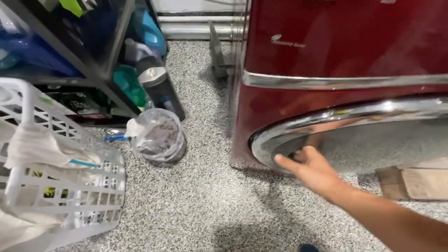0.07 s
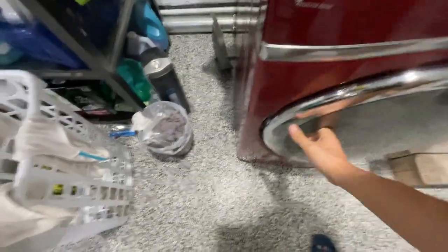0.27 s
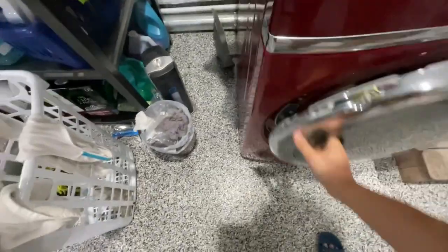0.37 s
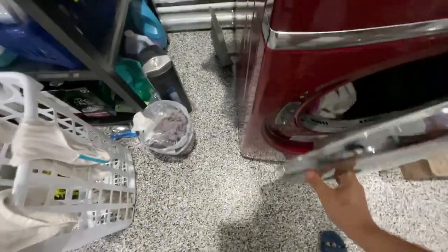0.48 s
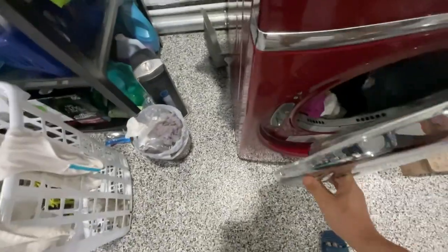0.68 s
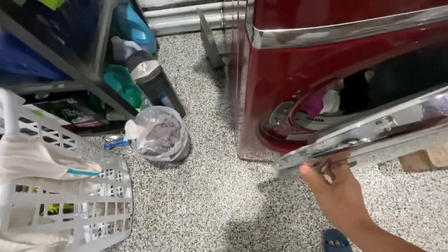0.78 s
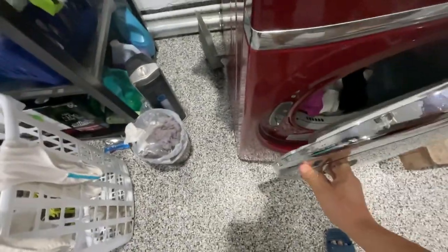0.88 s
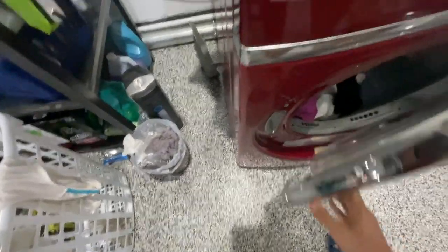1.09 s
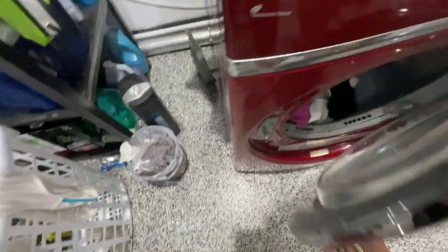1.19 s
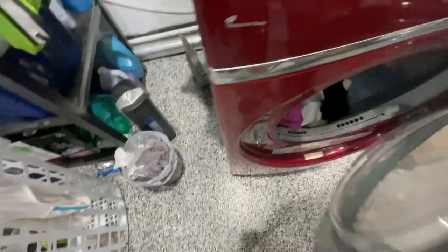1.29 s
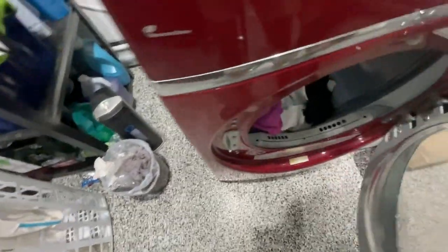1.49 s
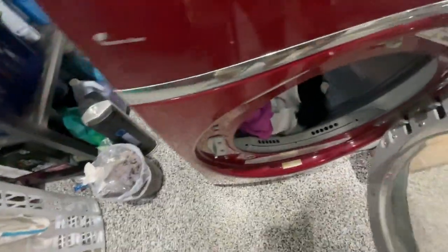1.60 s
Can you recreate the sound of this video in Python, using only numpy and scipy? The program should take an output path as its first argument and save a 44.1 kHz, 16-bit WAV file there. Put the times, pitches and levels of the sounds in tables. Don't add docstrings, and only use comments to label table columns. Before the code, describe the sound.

Front-loading washer door unlatches with a loud clunk, small clicks, then a faint sandal scuff.

```python
import sys
import numpy as np
from scipy import signal
from scipy.fft import rfft, irfft, next_fast_len
from scipy.io import wavfile
from scipy.ndimage import uniform_filter1d

SR = 44100
rng = np.random.default_rng(int(sys.argv[2]) if len(sys.argv) > 2 else 0)


def log_audio(samples):
    frames = np.atleast_2d(samples).T
    limited = np.clip(frames, -1, 1)
    pcm = np.round(limited * 32767).astype(np.int16)
    wavfile.write(sys.argv[1], SR, pcm)


def invert_db(level):
    return 10 ** (np.asarray(level, dtype=float) / 20)


N = 72765
T = np.arange(N) / SR

# pitch_hz, level_db
AIR_COLOUR = [(35, -44.5), (60, -17), (146, -7.5), (315, -14), (417, -19.5), (480, -16.5), (842, -28.5),
              (1910, -28.5), (16000, -57.5)]
# time_s, level_db
RUMBLE_LEVEL = [(0, -42), (.12, -56.5), (.26, -51), (.33, -37.5), (.5, -44.5), (.78, -57.5), (1.02, -59),
                (1.1, -60.5), (1.5, -56), (1.65, -55)]
# time_s, level_db
RUSTLE_LEVEL = [
    (0.0, -63.5),
    (0.138, -68.5),
    (0.218, -57),
    (0.25, -71),
]
# pitch_hz, level_db
RUSTLE_COLOUR = [(130, 0), (200, -6.5), (450, -17.5), (700, -10), (1000, -21), (3000, -29), (10000, -44),
                 (16000, -63.5)]
# pitch_hz, fade_60db_s, level_db
GARAGE_ECHOES = [(125, 1, -19.5), (256, 0.82, -13), (463, 0.59, -9), (945, 0.54, -12.5), (2250, 0.19, -9),
                 (3970, 0.63, -17.5), (8200, 0.3, -11.5), (12900, 0.59, -18)]
# time_s, level_db
SCUFF_LEVEL = [
    (1.1, -95.5),
    (1.2, -69.5),
    (1.262, -68),
    (1.278, -56.5),
    (1.325, -58),
    (1.4, -62.5),
    (1.465, -61),
    (1.53, -68),
    (1.65, -65),
]
# pitch_hz, level_db
SCUFF_COLOUR = [(200, 4), (500, 1.5), (1500, 0), (3500, -4), (6000, -6), (10500, -14.5), (16000, -21.5)]
# start_s, level_db, pitch_hz, fade_60db_s, hiss_db
TICKS = [(.822, -66, 4600, 0.0054, -11), (.833, -50.5, 2563, 0.026, -9), (1.062, -61.5, 4500, 0.0093, 4),
         (1.1694, -61.5, 4380, 0.019, 4.5), (1.1996, -55.5, 4470, 0.012, 5.5),
         (1.2765, -50.5, 1060, 0.012, 12.5), (1.296, -46, 6100, .01, -4), (1.32, -54, 5900, .012, 10),
         (1.4445, -44, 2010, 0.013, 0), (1.461, -56, 3370, 0.008, 4), (1.4651, -48, 2500, 0.016, 3),
         (1.472, -61, 1810, .015, -1), (1.548, -56, 2750, .02, -8), (1.545, -72, 14000, 0.0066, -27),
         (1.5766, -55.5, 13600, 0.0034, 6.5), (1.63, -72, 14820, 0.0046, -10)]
# start_s, level_db, length_s, swing_hz
BLOWS = [(.17, -48, 0.023, 169), (0.275, -30.5, 0.016, 200), (.289, -20.5, 0.013, 253.5),
         (.2985, -15.5, 0.023, 160.2), (0.325, -21, 0.025, 148), (0.3609, -13.5, 0.025, 145.4),
         (0.388, -32.5, 0.021, 193), (.41, -42, .03, 140.5), (0.471, -38.5, 0.06, 108),
         (.53, -46.5, 0.062, 113.8), (.60, -42, 0.052, 155), (.66, -45, 0.028, 125),
         (0.733, -43.5, 0.025, 129), (.935, -51, 0.016, 218), (.972, -48, 0.023, 147.7),
         (1.571, -44.5, 0.018, 192), (1.588, -36, 0.037, 106.9)]
# pitch_hz, level_db, fade_60db_s
CABINET_TONES = [(56, -14, .6), (72.76, -12, .5), (108, -19.5, 0.26), (126.8, -7, 0.21), (155, 0, 0.08),
                 (217.5, 0, 0.057), (249.6, -2.5, 0.11), (308.9, -9, 0.29)]
HINGE_TONES = [(331, -12, 0.085), (552.5, -2.5, 0.063), (791, -1, 0.035), (1090, -6, 0.034),
               (1288, -2, 0.034), (1747, -3.5, 0.041), (2225, -1.5, 0.023), (2460, -3, 0.026),
               (2896, -9.5, .02), (3640, -16, 0.0216)]
HANDLE_TONES = [(599, -3.5, 0.024), (750, -3.5, 0.037), (995, -7.5, 0.024), (1254, -1, 0.025),
                (1480, 1.5, 0.01), (1824, 0.5, 0.022), (3070, -5.5, 0.019), (4440, -2.5, 0.0038),
                (5900, -13.5, 0.0037), (7600, -13.5, 0.0035)]
DOOR_TONES = [(515, -14, 0.04), (560.3, -13.5, 0.054), (760, -14.5, 0.03), (842, -17, 0.031),
              (998, -9.5, 0.03), (1097, -5, 0.019), (1340, -2.5, 0.022), (1467, -5.5, 0.022),
              (1680, -15.5, 0.0088), (2310, -10, 0.012), (2750, -10.5, 0.015), (3700, -13, 0.0039),
              (4600, -8, 0.002), (6440, -14.5, 0.0053)]
LATCH_TONES = [(640, -18, .03), (803, -19, 0.016), (1312, -7, 0.022), (1503, -8, 0.013),
               (1840, -10, 0.0087), (2740, -19, 0.0087), (3800, -1, 0.011), (4420, -1.5, 0.005),
               (4685, -1, 0.0051), (5614, -5.5, 0.007), (6114, 1, 0.0074), (8630, -14.5, .008),
               (10270, -12, 0.012)]
# start_s, length_s, level_db, tilt_db_per_octave, grit_db
KNOCK = [
    (.6795, 0.0058, -42, 2, -17),
    (.685, 0.0078, -37, 0.9, -31),
    (.698, 0.0068, -38.5, -1, -28),
    (.71, 0.017, -47, 0.5, -35),
]
# start_s, length_s, level_db, tilt_db_per_octave, grit_db
CLICKS = [
    (.136, 0.0042, -41, 2, -18),
    (.1825, 0.0029, -35.5, -2.7, -25.5),
    (.1975, 0.0099, -29.5, -0.5, -6),
]
# start_s, length_s, level_db, tilt_db_per_octave, grit_db
CLATTER = [(.2805, 0.0053, -26, 0.5, -12.5), (.2862, 0.0041, -13, 0.5, -12.5),
           (.2922, .004, -16, -0.5, -11.5), (.2968, .005, -20.5, -3.5, -5.5),
           (.3045, 0.0064, -22.5, -5, -7.5), (.338, .008, -31.5, -1, 0), (.3462, .007, -14.5, 1.13, -10.5),
           (.3525, 0.0062, -18.5, 4, -10), (.3575, 0.0079, -22, 2.5, -11.5),
           (.366, 0.0078, -27.5, -12.5, -12), (.384, 0.019, -30, -8, -6.5), (.405, .012, -37, -5, -11),
           (.459, 0.012, -45, 12.5, 1.5)]
# pitch_hz, left_minus_right_db
PORT_LEVELS = [(60, -.5), (300, -1.5), (700, 4.5), (1400, 2.5), (2380, 1.5), (4200, -1.5), (7000, -2),
               (9500, 0)]
# pitch_hz, phase_lead_rad
PORT_PHASE = [(0, 0), (400, -.6), (1460, -1.1), (2150, -2.6), (4220, -6.4), (6200, -8), (8600, -12.6),
              (22050, -13)]
# pitch_hz, level_db
MIDDLE_LIFT = [(1300, 0), (1800, 2), (2400, 6), (3100, 2.5), (4200, 0), (6200, 0), (7000, 3.5), (8000, 0)]

SIDES = np.array([[1], [-1]])
SNAP_S, SNAP_DB = .2476, -7.5
REBOUND_S, REBOUND_DB = 0.0048, -11.5


def read(table, x, log=False):
    a, b = np.array(table, float).T[:2]
    if log:
        return np.interp(np.log(np.maximum(x, 1)), np.log(np.maximum(a, 1)), b)
    return np.interp(x, a, b)


def unit(x):
    return x / np.sqrt(np.mean(x ** 2) + 1e-30)


def band(x, lo_hz, hi_hz):
    edges = [lo_hz, min(hi_hz, .47 * SR)]
    return signal.sosfilt(signal.butter(2, edges, "band", fs=SR, output="sos"), x)


def colour(x, table):
    gain = invert_db(read(table, np.fft.rfftfreq(N, 1 / SR), log=True))
    return unit(irfft(rfft(x) * gain, N))


def walk(rate, size=1):
    k = int(SR / rate)
    steps = np.repeat(rng.standard_normal((size, N // k + 1)), k, axis=1)
    return 1.4 * uniform_filter1d(uniform_filter1d(steps, k), k)[:, :N]


def add(out, x, at_s, db):
    i = int(at_s * SR)
    x = x[:N - i]
    out[i:i + len(x)] += x * invert_db(db) / np.abs(x).max()


def ring(tones, tilt_db=0., count=5):
    hz, db, t60 = np.repeat(np.array(tones, float), count, axis=0).T[:, :, None]
    t = T[:SR // 4]
    chance = rng.standard_normal((3, len(hz), 1))
    spread = 0.02 * (count > 1) * np.clip(0.039 / t60, .2, 2)
    hz = np.minimum(hz * (1 + spread * chance[0]), .45 * SR)
    sign = np.repeat(np.sign(chance[1, ::count]), count, axis=0)
    gain = sign * invert_db(db + 1.9 * chance[2] + tilt_db * np.log2(hz / 1300))
    fade = np.exp(-np.log(1000) * t / t60)
    return (gain * np.sin(2 * np.pi * hz * t) * fade).sum(axis=0)


def contacts(table, tones, body_share, body_hz):
    out = np.zeros(N)
    for at, length, db, tilt, grit_db in table:
        n = int(length * SR)
        noise = rng.standard_normal((2, 2000))
        body = band(rng.standard_normal(SR // 4), *body_hz) * np.exp(-T[:SR // 4] / 0.0038)
        hits = noise[0, :n] * (np.abs(noise[1, :n]) > 1.9) + 2.7 * (np.arange(n) == 0)
        response = ring(tones, tilt, count=2) + body_share * body
        add(out, signal.fftconvolve(hits, response), at, db)

        fade = np.exp(-np.maximum(T[:2000] - 0.71 * length, 0) / 0.0024)
        grit = band(noise[1] * invert_db(np.abs(noise[0])) * fade, 3500., 14000.0)
        grit = grit + .5 * band(noise[0] * fade, 9000., 12000.0)
        add(out, grit, at, db + grit_db)
    return out


def background():
    air = [colour(rng.standard_normal(N), AIR_COLOUR) * invert_db(-67 + 3.1 * walk(32)[0]) for _ in range(2)]

    low = unit(band(band(rng.standard_normal(N), 31.0, 75.), 45.0, 74.0))
    low = low * invert_db(read(RUMBLE_LEVEL, T) + 2.0 * walk(4.5)[0])

    cloth = colour(rng.standard_normal(N), RUSTLE_COLOUR)
    cloth = cloth * invert_db(read(RUSTLE_LEVEL, T) + 9.5 + 1.7 * walk(45)[0])
    cloth = cloth * np.clip((.3 - T) / 0.046, 0, 1)
    return air[0] + low + cloth + 0.61 * air[1] * SIDES


def garage(x):
    t, tail = T[:SR], 0
    alike = .2
    for hz, t60, db in GARAGE_ECHOES:
        mid, side = rng.standard_normal((2, SR))
        wide = np.sqrt(1 - alike) * min(hz / 700, 1)
        pair = band(np.sqrt(1 + alike) * mid + wide * side * SIDES, hz / 1.7, hz * 1.7)
        fade = np.exp(-np.log(1000) * t / t60)
        tail = tail + pair * fade * invert_db(db) / np.sqrt(t60 * SR / 14)
    tail = tail * np.clip((t - .003) / 0.005, 0, 1)
    return signal.fftconvolve(x[None], tail, axes=1)[:, :N]


def sandal():
    grains_per_s = 2500
    grains = (rng.random(N) < grains_per_s / SR) * rng.standard_normal(N)
    grains = grains * invert_db(2.96 * rng.exponential(size=N))
    drag = colour(unit(grains) + 1.51 * rng.standard_normal(N), SCUFF_COLOUR)
    level_db = read(SCUFF_LEVEL, T)
    drag = drag + band(drag, 5760.0, 21000.0) * invert_db(3.2 * (level_db + 59.5))
    onset = np.clip((T - SCUFF_LEVEL[0][0]) / 0.0377, 0, 1)
    return drag * invert_db(level_db + 2.0 + 0.5 * walk(49.4)[0]) * onset


def ticks():
    out = np.zeros(N)
    for at, db, hz, t60, hiss_db in TICKS:
        spit = rng.standard_normal((2, 1500)) * np.exp(-T[:1500] / 0.00276)
        tones = [(hz, 0, t60), (1.4 * hz, -14, t60), (.55 * hz, -13, t60)]
        add(out, signal.fftconvolve(spit[0, :8], ring(tones, count=2)), at, db)
        add(out, band(spit[1], 900., 11000.), at, db + hiss_db)
    return out


def cabinet():
    sag, thud_db, hum_db = 0.079, -12.5, -19.5
    swing, thud = np.zeros((2, N))
    for at, db, length, hz in BLOWS:
        t = T[:int(length * SR)]
        noise = rng.standard_normal(6000)
        turn = 2 * np.pi * hz * t * (1 - sag * t / length)
        shape = np.sin(np.pi * t / length) ** .5
        add(swing, shape * (np.sin(turn) - .22 * np.cos(2 * turn)), at, db)
        fade = np.exp(-T[:6000] / (0.68 * length))
        add(thud, band(noise * fade, 170., 480.), at, db + thud_db)
    hum = signal.fftconvolve(swing, ring(CABINET_TONES, count=1))[:N]
    return swing + thud + invert_db(hum_db) * hum * 2 * np.pi * 140 / SR


def hook():
    handle = contacts(CLICKS, HANDLE_TONES, 2.5, (500., 7000.))
    frame = contacts(CLATTER, DOOR_TONES, 2.5, (1000., 1650.))
    hinge = contacts(KNOCK, HINGE_TONES, 2.25, (700., 3000.))
    return handle + frame + hinge


def latch():
    out = np.zeros(N)
    rise = np.clip(T[:4000] / 0.00048, 0, 1)
    snap = ring(LATCH_TONES, count=1)[:4000] * rise
    add(out, band(snap, 610.0, 13000.0), SNAP_S, SNAP_DB)
    rebound = band(ring(LATCH_TONES, -1.7, count=3), 500.0, 11000.0)
    add(out, rebound, SNAP_S + REBOUND_S, SNAP_DB + REBOUND_DB)
    rough = rng.standard_normal(2000) * np.exp(-T[:2000] / 0.01)
    add(out, band(rough, 620.0, 5000.0), SNAP_S + .002, SNAP_DB - 13)
    return out


def scene():
    door = latch() + hook() + cabinet()
    low = ticks() + sandal()
    echo = invert_db(-5) * np.roll(low, int(.003 * SR)) * SIDES
    return door + low + echo + garage(door + low) + background()


def roll_off(x):
    return signal.sosfilt(signal.butter(12, 16480, fs=SR, output="sos"), x)


def record(dry):
    size = next_fast_len(N + 2048)
    hz = np.fft.rfftfreq(size, 1 / SR)
    half = invert_db(read(PORT_LEVELS, hz, log=True) / 2) * np.exp(.5j * read(PORT_PHASE, hz))

    bounce = band(rng.standard_normal((2, 1500)) * np.exp(-T[:1500] / .003), 350.0, 13000.0)
    bounce = bounce / np.sqrt((bounce ** 2).sum(axis=1, keepdims=True))
    scatter = 1 + invert_db(-12) * rfft(bounce, size)

    low_hz, top_hz = 43.16, 16000
    reach = hz ** 3 / (hz ** 3 + low_hz ** 3) / (1 + (hz / top_hz) ** 60)
    pair = rfft(dry, size) * np.array([half, 1 / half]) * scatter * reach
    pair = pair + (invert_db(read(MIDDLE_LIFT, hz, log=True)) - 1) * pair.mean(axis=0)
    mix = irfft(pair, size)[:, :N]
    return roll_off(mix)


dry = scene()
out = record(dry)
log_audio(out)
```